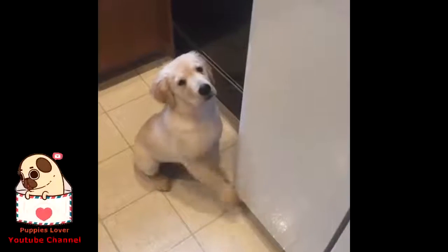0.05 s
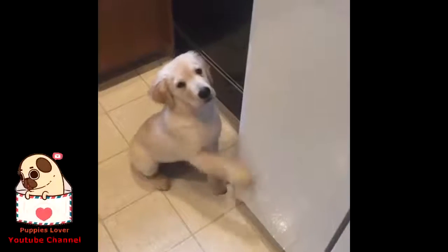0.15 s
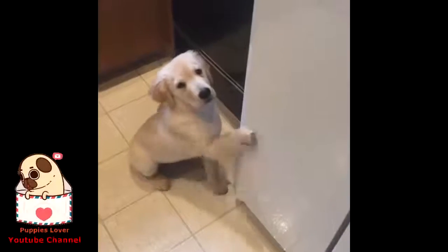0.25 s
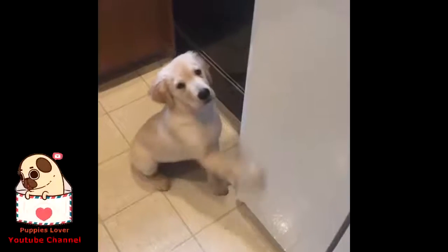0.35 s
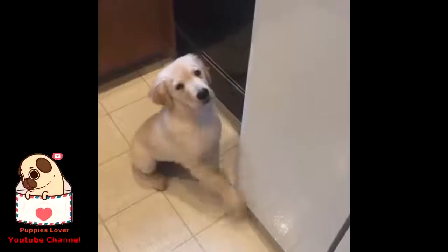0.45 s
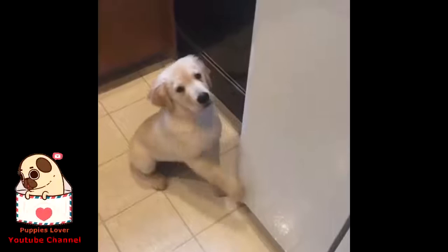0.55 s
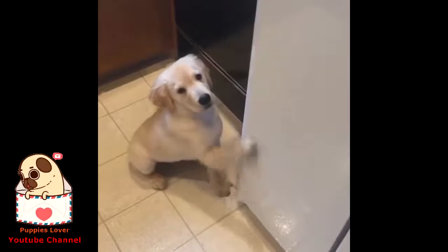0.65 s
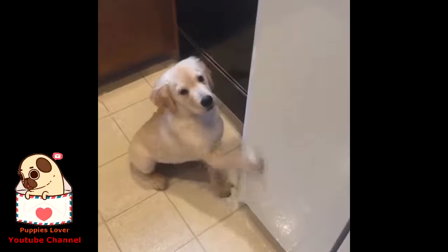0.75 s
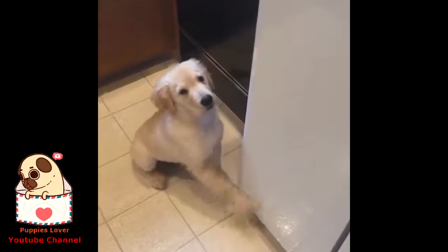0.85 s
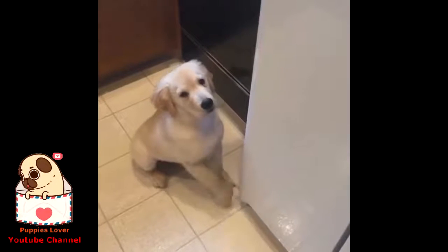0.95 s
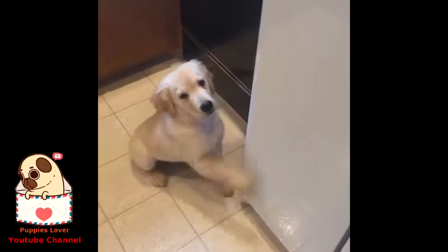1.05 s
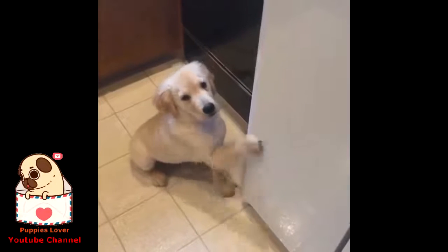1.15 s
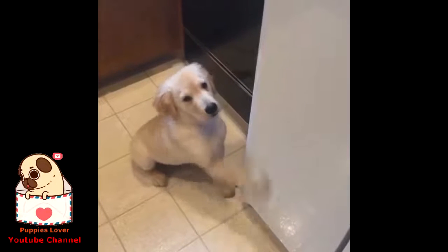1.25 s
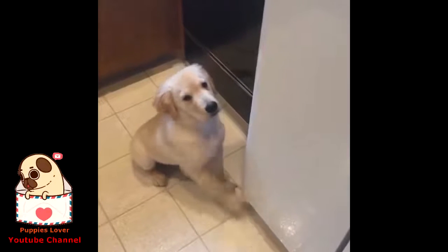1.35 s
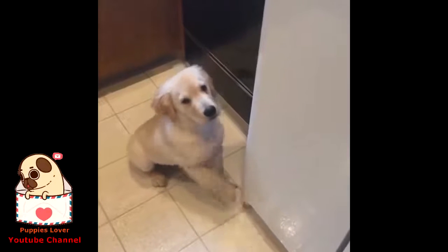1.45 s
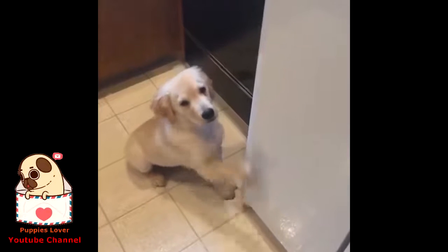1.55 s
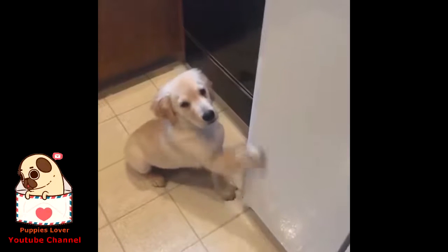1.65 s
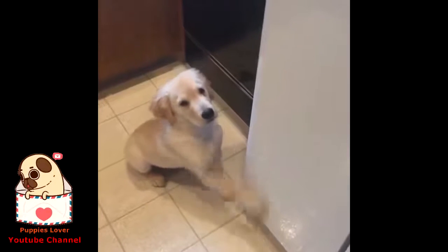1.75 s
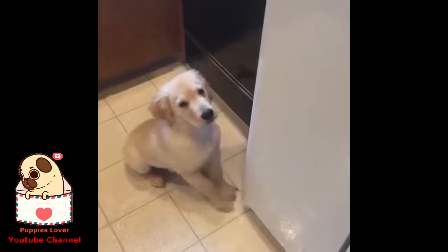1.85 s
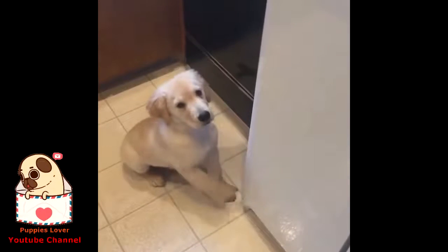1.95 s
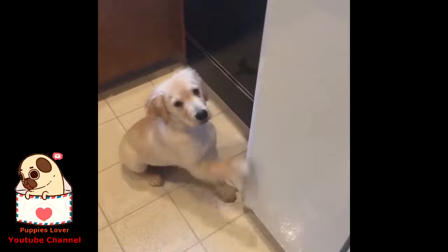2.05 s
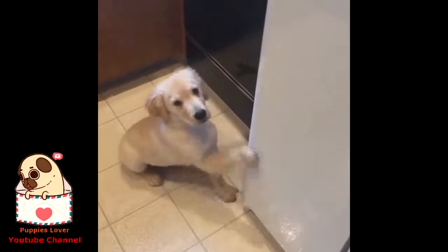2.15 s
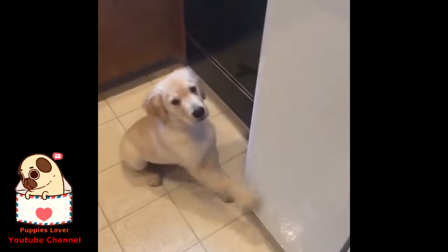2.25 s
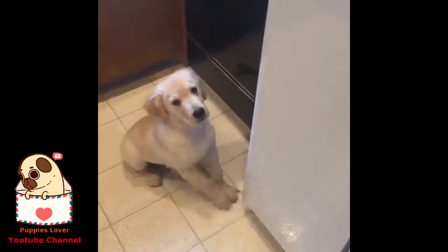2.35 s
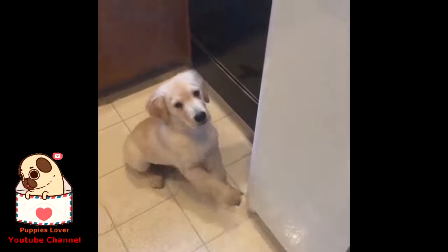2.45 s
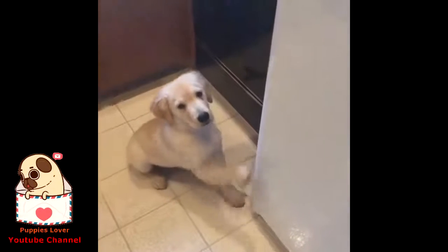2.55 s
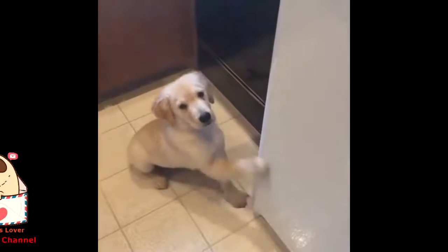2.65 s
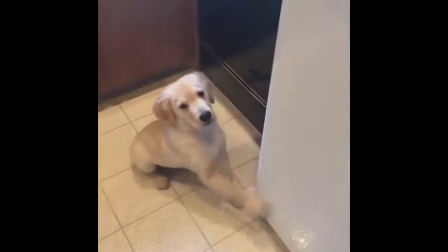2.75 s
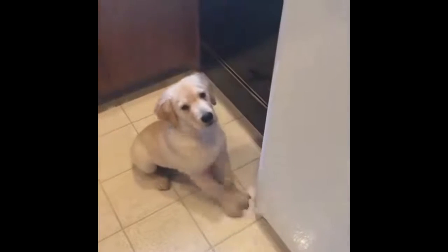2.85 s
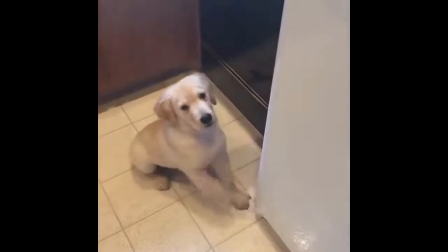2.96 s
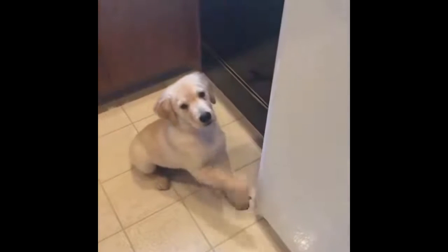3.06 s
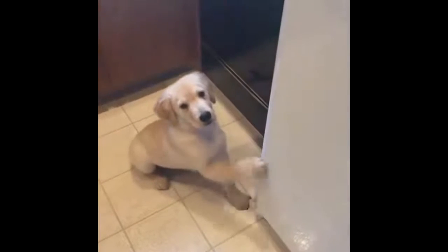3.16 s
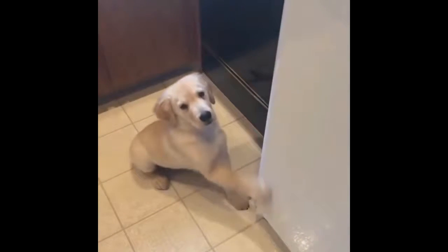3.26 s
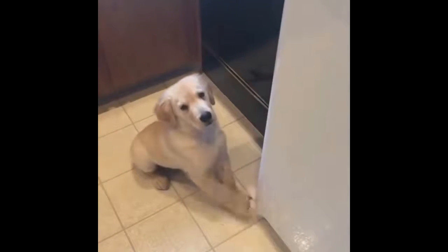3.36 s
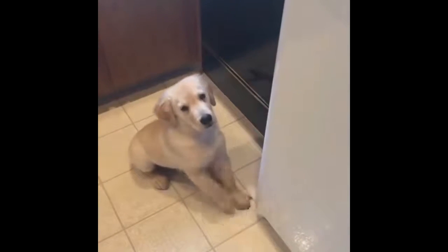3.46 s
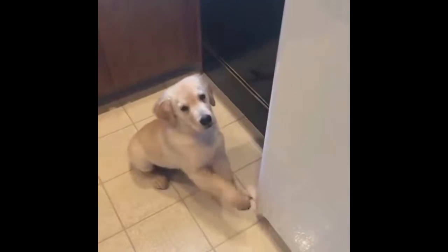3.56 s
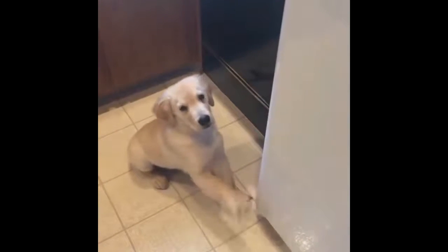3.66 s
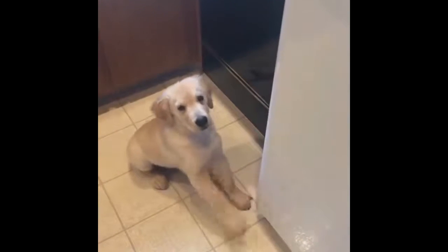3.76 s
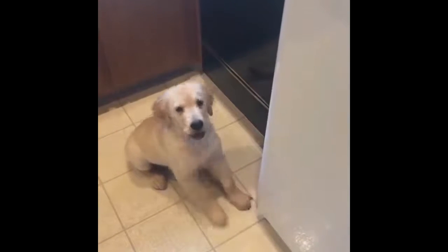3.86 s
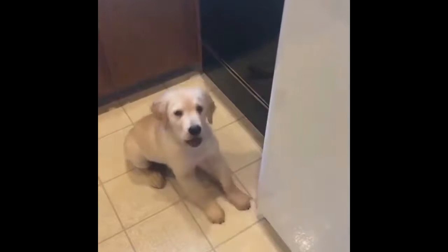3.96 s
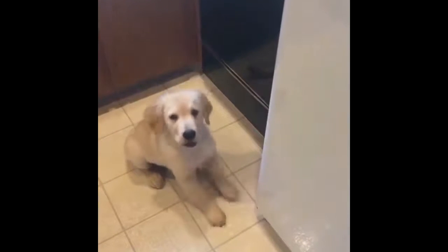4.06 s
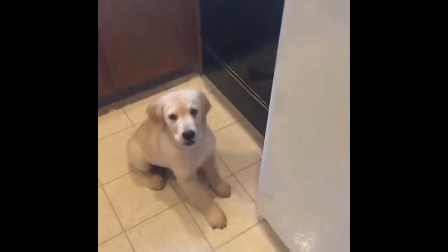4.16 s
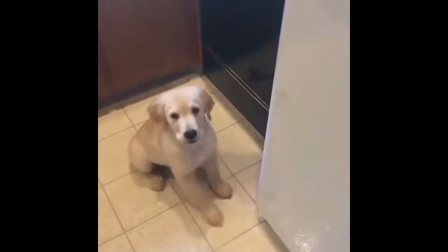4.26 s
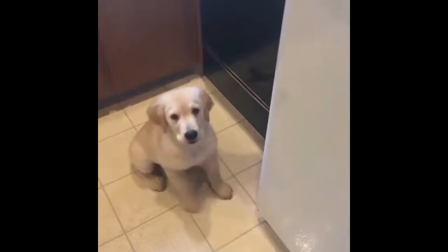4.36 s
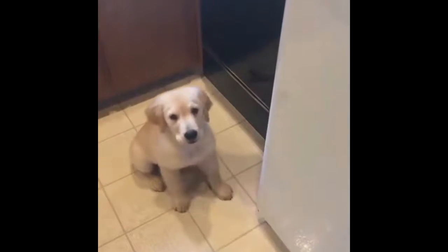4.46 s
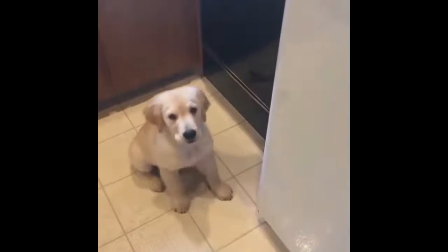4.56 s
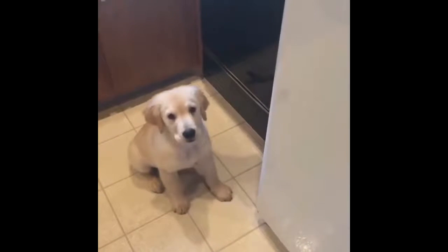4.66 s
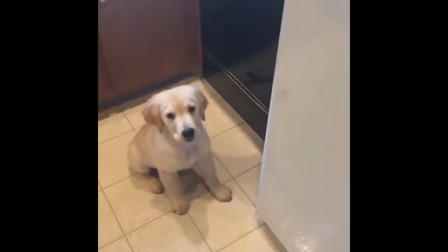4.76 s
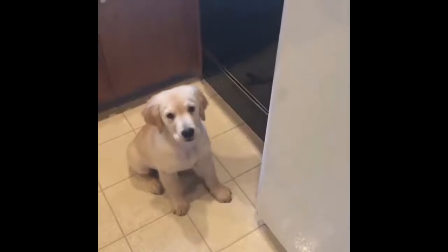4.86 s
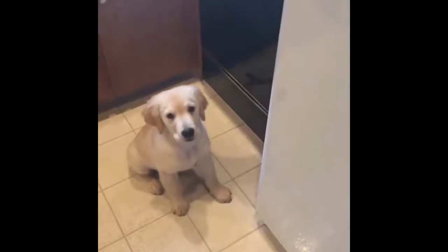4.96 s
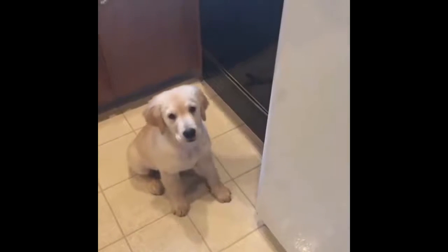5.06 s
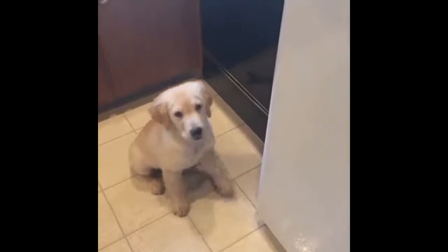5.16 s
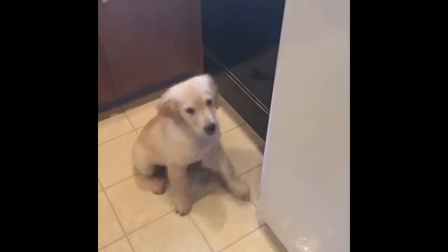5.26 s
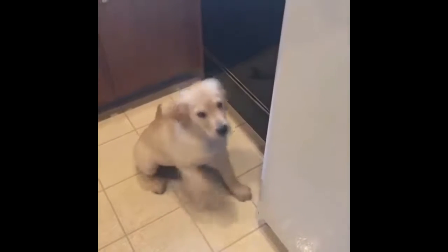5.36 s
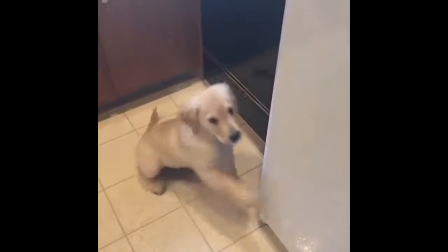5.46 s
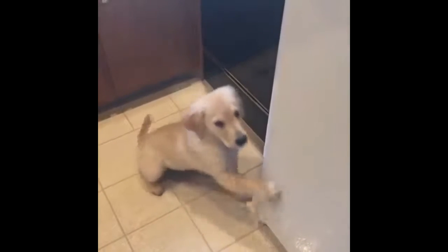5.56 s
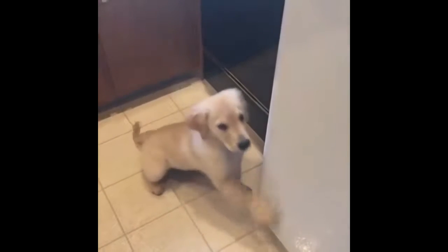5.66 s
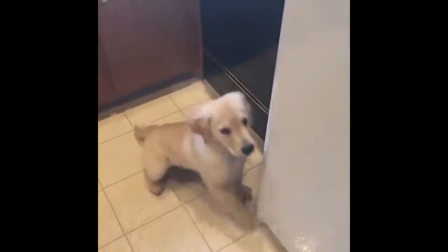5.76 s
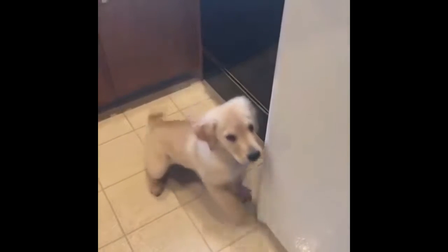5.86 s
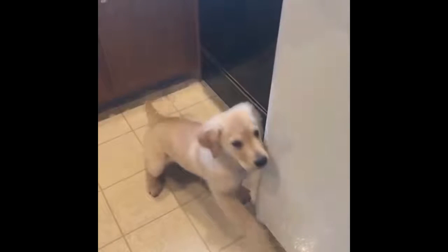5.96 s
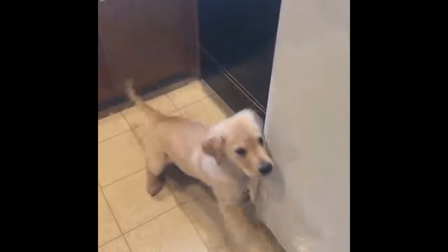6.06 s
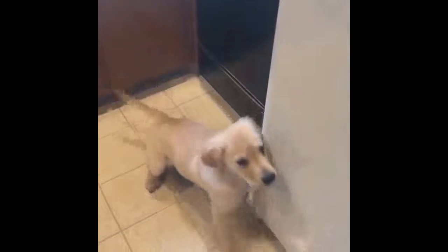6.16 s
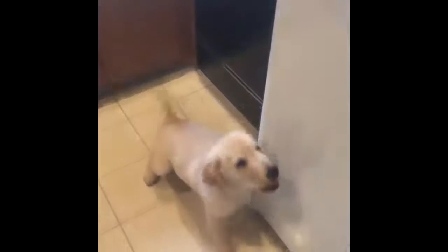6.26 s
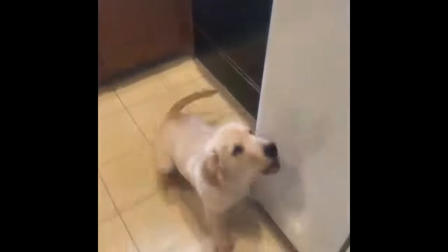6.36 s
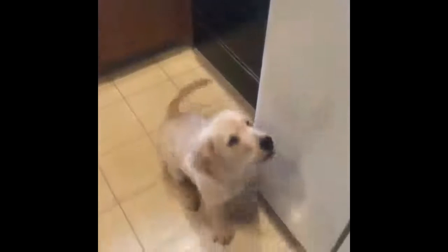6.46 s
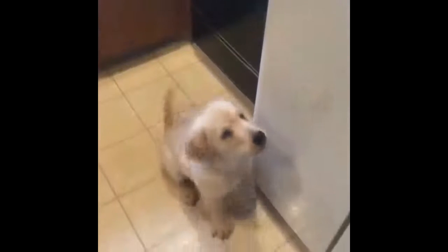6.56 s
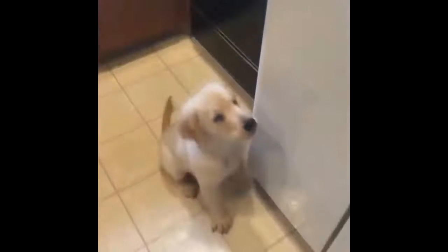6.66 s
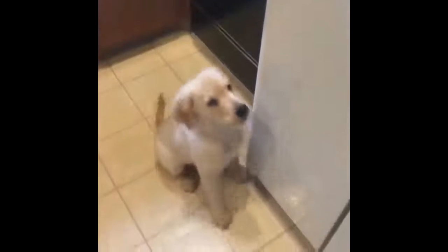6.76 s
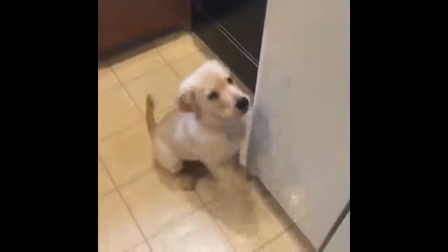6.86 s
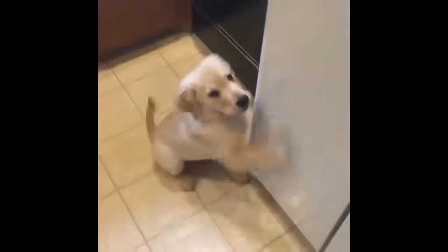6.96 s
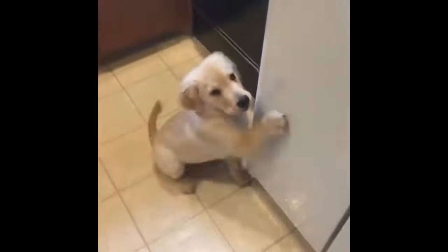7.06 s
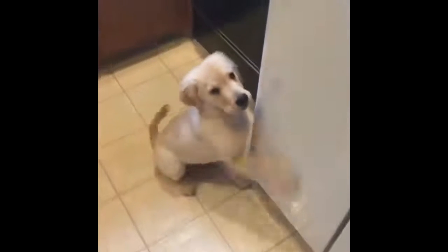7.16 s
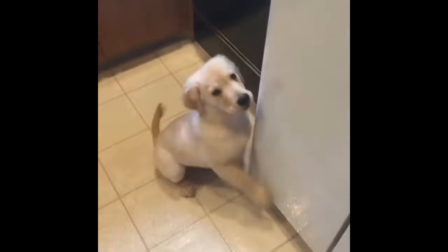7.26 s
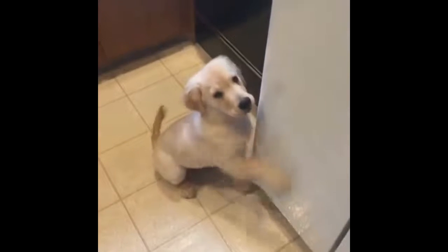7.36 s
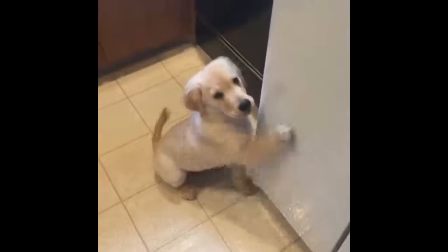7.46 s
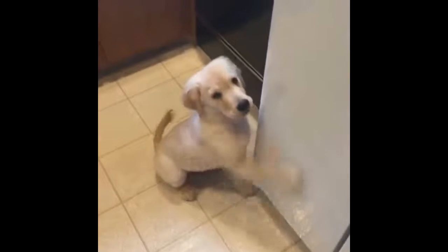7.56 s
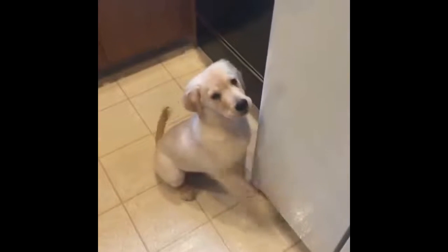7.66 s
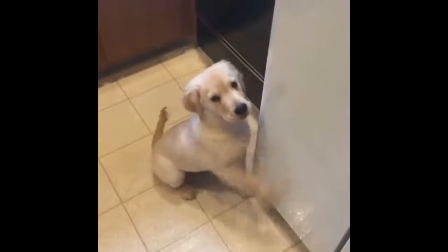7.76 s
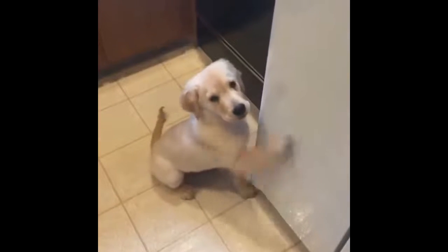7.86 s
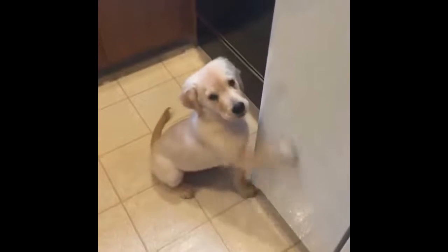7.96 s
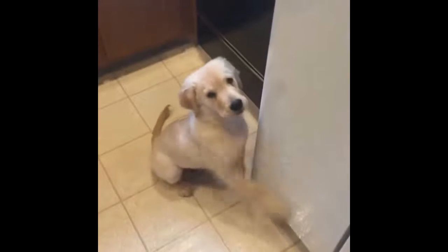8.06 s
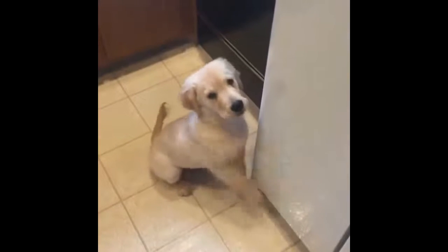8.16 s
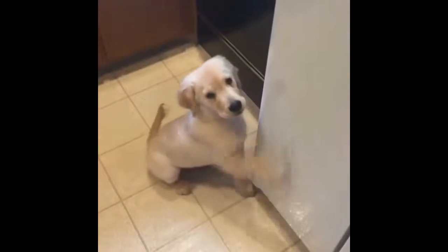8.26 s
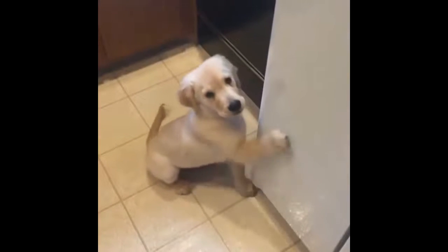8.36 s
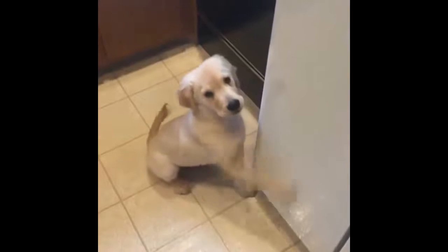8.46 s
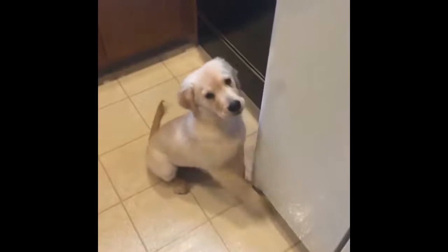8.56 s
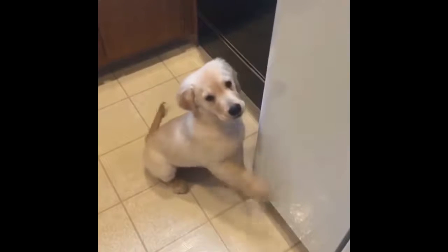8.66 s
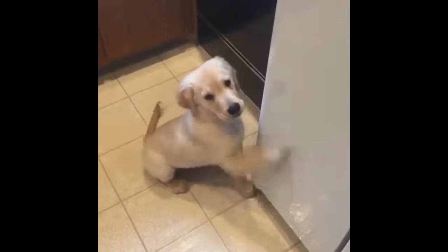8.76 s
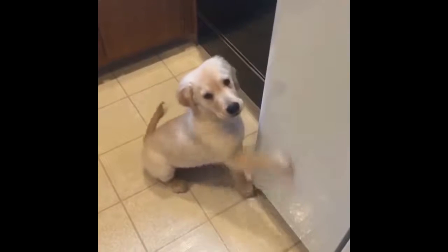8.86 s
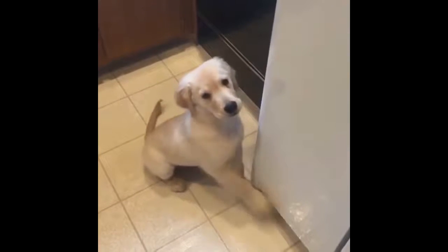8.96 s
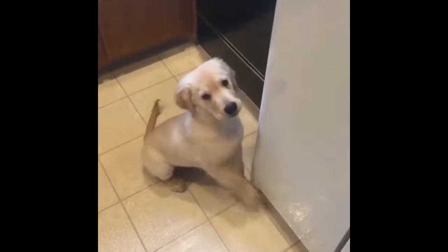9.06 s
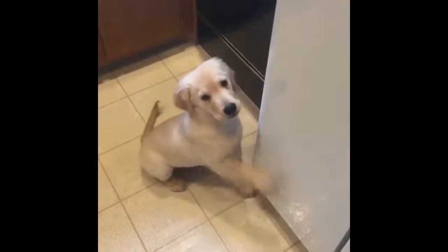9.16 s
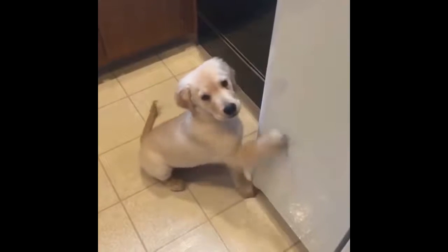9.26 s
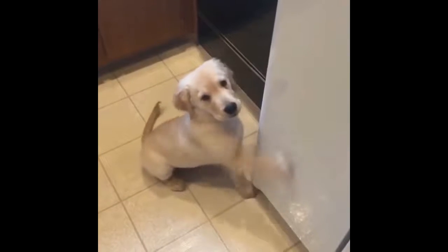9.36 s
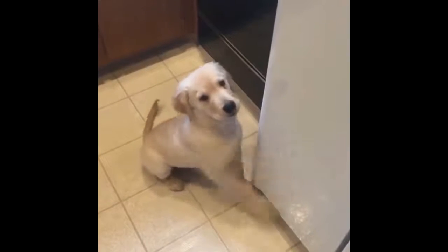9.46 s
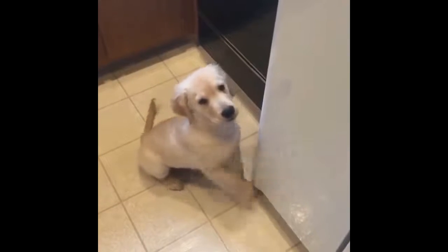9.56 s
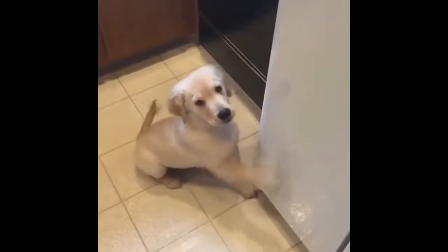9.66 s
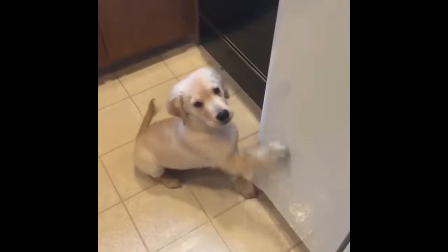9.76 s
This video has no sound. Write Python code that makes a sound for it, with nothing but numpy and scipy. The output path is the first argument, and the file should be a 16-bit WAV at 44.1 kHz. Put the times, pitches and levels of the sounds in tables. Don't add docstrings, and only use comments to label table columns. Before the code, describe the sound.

A quiet refrigerator hum and low room rumble run throughout a reverberant tiled kitchen. From 0 s a puppy paws the door roughly every half second: a quick clattering slap of claws, then a hissing, faintly squeaky drag of about a quarter second. The first strokes are lighter; those from 1.35 to 3.4 s are harder, with small secondary catches and a faint grumble near 2 s. Scratching stops after about 3.7 s. At 4.05 s comes a short hoarse bark, falling in pitch, its echo dying away. Soft footfalls thud at 4.3 and 5.2 s, with faint paw touches around 5.5 to 5.8 s. A louder, rising bark bursts at 6.45 s, with foot thuds around it and at 6.8 s. From 7.2 s rhythmic slaps and scrapes return, ringing the door more, strongest from 9 s, with a low grumble and thin whine near 9.7 s.

```python
import sys
import numpy as np
from scipy import signal
from scipy.fft import rfft, irfft
from scipy.io import wavfile
from scipy.ndimage import uniform_filter1d

SR = 44100
rng = np.random.default_rng(int(sys.argv[2]) if len(sys.argv) > 2 else 0)


def file_out(sig):
    cols = np.atleast_2d(sig).T
    lim = np.clip(cols, -1, 1)
    pcm = np.round(lim * 32767).astype(np.int16)
    wavfile.write(sys.argv[1], SR, pcm)


def makeup_ratio(level_db):
    decades = np.asarray(level_db, float) / 20
    return 10 ** decades


N = 432083
HZ = np.fft.rfftfreq(4096, 1 / SR)


def evened(x):
    return x / np.sqrt(np.mean(x ** 2) + 1e-20)


def read(points, hz):
    f, value = np.transpose(points)
    return np.interp(np.log(hz + 1), np.log(f + 1), value)


def add(mix, s, sound):
    part = mix[round(s * SR):][:len(sound)]
    part += sound[:len(part)]


def columns(rows):
    s, *values = np.transpose(rows)
    t = np.arange(s[0], s[-1], 1 / SR)
    return [s[0]] + [np.interp(t, s, v) for v in values]


def wander(length, hz):
    return evened(uniform_filter1d(rng.standard_normal(length), int(SR / hz)))


def resonate(x, hz, width):
    r = np.exp(-np.pi * width / SR)
    if np.ndim(hz) == 0:
        return 2 * signal.lfilter([1 - r], [1, -r * np.exp(2j * np.pi * hz / SR)], x).real
    turn = np.exp(2j * np.pi * np.cumsum(hz) / SR)
    return 2 * (turn * signal.lfilter([1 - r], [1, -r], x / turn + 1e-18)).real


def twice(x, hz, width):
    return evened(resonate(resonate(x, hz, width), hz, 1.39 * width))


def colour(x, db):
    log_gain = np.log(makeup_ratio(np.maximum(np.r_[db, db[-2:0:-1]], -100)))
    taps = np.fft.ifft(np.exp(np.conj(signal.hilbert(log_gain)))).real[:2048]
    return signal.fftconvolve(x, taps / np.linalg.norm(taps))[:len(x)]


def tilt(low_db, high_db):
    return read([(1200, low_db), (1900, 0.0046), (4500, 0), (7500, high_db), (13000, high_db - 2.0),
                 (15000, high_db)], HZ)


def swell(start, top, end, rise_db, fall_db, bend):
    t = np.arange(start, end, 1 / SR)
    before = np.clip((top - t) / max(top - start, .08), 0, 1)
    after = np.clip((t - top) / (end - top), 0, 1)
    return rise_db * before + fall_db * after ** bend, (t - start) / (end - start)


def panel():
    return 1.5 * wander(len(HZ), hz=3000)


def hum():
    # f/Hz, density/dB
    room_air = [(12, -67.5), (20, -27.5), (60, 0.5), (266, -14.0), (305, -3.5), (447, -14.5), (485, -19.0),
                (673, -22.5), (751, -29.0), (860, -29.5), (1750, -34.0), (2490, -39.5), (13500, -48),
                (13950, -47), (14080, -89)]
    # f/Hz, width/Hz, level/dB
    hum_bands = [(308.7, 5.3, -55.5), (400, 18.6, -62.5), (437.7, 37, -63), (649.4, 30, -68.5),
                 (1499, 100, -77), (6700, 390, -79.5)]
    hz = np.fft.rfftfreq(N, 1 / SR)
    spectrum = rfft(rng.standard_normal(N)) * makeup_ratio(read(room_air, hz))
    low = np.clip((240 - hz) / 60, 0, 1)
    rumble = irfft(spectrum * low, N) * makeup_ratio(1.8 * wander(N, hz=14))
    hiss = irfft(spectrum * (1 - low), N)
    white = rng.standard_normal(N)
    fridge = sum(makeup_ratio(db) * twice(white, f, width) for f, width, db in hum_bands)
    return makeup_ratio(-48.5) * evened(rumble + hiss) + fridge


def kitchen(x):
    # f/Hz, t60/s
    decay = [(100, 0.2), (400, 0.56), (900, 0.7), (2500, 0.51), (6000, 0.5), (14000, 0.24)]
    out, at = np.zeros(N), np.arange(250, SR - 20, 20)
    turn = np.pi * np.arange(N) / SR / 1.43
    for k in range(3):
        taps = np.zeros(SR)
        taps[at + rng.integers(0, 20, len(at))] = rng.choice([-1., 1.], len(at))
        hz, t, z = signal.stft(taps, SR, nperseg=256)
        tail = signal.istft(z * makeup_ratio(-60 * t / read(decay, hz)[:, None]), SR, nperseg=256)[1]
        share = np.sqrt(2 / 3) * np.cos(turn + k * np.pi / 3)
        out += signal.fftconvolve(x * share, tail / np.linalg.norm(tail))[:N]
    return out


def thuds():
    # t/s, level/dB, pitch/Hz, t60/s
    footfalls = [(3.035, -36, 200, 0.14), (3.587, -40, 209, 0.083), (4.274, -38.5, 120, 0.095),
                 (5.225, -32, 113, 0.078), (5.519, -39.5, 151, 0.17), (5.568, -40, 158, 0.1),
                 (5.731, -36.5, 98, 0.09), (6.344, -35.5, 109, 0.14), (6.391, -30.5, 149, 0.082),
                 (6.816, -27.5, 170, 0.094), (9.159, -28.5, 300, 0.032), (9.467, -47, 174, 0.19)]
    out, t = np.zeros(N), np.arange(9000) / SR
    onset = np.sin(np.pi / 2 * np.clip(t / 0.0095, 0, 1)) ** 2
    for s, db, hz, t60 in footfalls:
        puff = twice(resonate(rng.standard_normal(len(t)), hz, 300), hz, 170)
        falling_hz = hz * (.8 + 0.65 * np.exp(-t / .012))
        swing = np.sin(2 * np.pi * np.cumsum(falling_hz) / SR)
        add(out, s, makeup_ratio(db + 7.5 - 60 * t / max(t60, .03)) * (swing + 0.45 * puff) * onset)
    return out


def whine(s, length, db, hz, glide_hz):
    n = round(length * SR)
    pitch_hz = hz * (1 + 0.033 * wander(n, hz=16.2)) + glide_hz * np.linspace(-1, 1, n)
    broken_db = 3 * wander(n, hz=30)
    whistle = twice(rng.standard_normal(n), pitch_hz, 48)
    return s, makeup_ratio(db - 4 + broken_db) * whistle * signal.windows.tukey(n, .4)


def grumble(s, top, end, db, throat_db):
    chest_db = db + swell(s, top, end, rise_db=-12.5, fall_db=-13, bend=1.07)[0]
    n = len(chest_db)
    pulse_hz = 60 * (1 + 0.21 * wander(n + 1, hz=56.6))
    drive = np.diff(np.floor(np.cumsum(pulse_hz) / SR)) + 0.034 * rng.standard_normal(n)
    chest = evened(resonate(resonate(drive, 105.5, 43), 96, 99))
    throat = evened(resonate(resonate(drive, 262, 70), 356, 53))
    return s, makeup_ratio(chest_db - 2.0) * (chest + makeup_ratio(throat_db) * throat) * signal.windows.tukey(n, .3)


def bark(rows, tract, bands, crest_s, throb_hz, depth, rough, leak):
    # f/Hz, density/dB
    breath_tone = [(650, -33.5), (1100, -12.5), (1610, -8), (2100, -9), (2500, -5.5), (2700, -10.5),
                   (3010, -10.5), (5140, -17), (6830, -23.5), (9070, -21), (10000, -31.5), (13300, -31),
                   (15000, -55.5)]
    s, chest_db, air_db, hz, opening = columns(rows)
    huff_hz, open_hz, lift_hz, drop_hz, open_db = tract
    n, shut = len(hz), np.clip(1 - opening, 0, 1)
    mouth_hz = open_hz + lift_hz * shut
    mouth_db = open_db + (-30 - open_db) * shut ** 3.4
    huff_db = -19.5 + (0.1 + 19.5) * shut ** 2.8
    rough = np.clip(rough + leak * (chest_db.max() - chest_db), 0, 1)

    turns = np.cumsum(hz * (1 + .07 * wander(n, hz=104.8))) / SR
    throb = np.cos(2 * np.pi * throb_hz * (s + np.arange(n) / SR - crest_s))
    flutter = 1 + depth * (1 + rough.min() - rough) * throb
    folds = sum(np.cos(2 * np.pi * k * turns) for k in range(1, 4))
    puffs = (1.2 + np.exp(-(turns % 1) / 0.29)) * rng.standard_normal(n)

    chest = (1 - rough) * twice(folds, hz, 250)
    chest += rough * twice(resonate(puffs, hz, 370), 0.828 * hz, 212)
    overtone = resonate(evened(folds) + evened(puffs), 2 * hz, 290)
    chest += makeup_ratio(-15) * twice(overtone, 2 * hz, 196)
    mouth = (1 - rough) * twice(resonate(folds, mouth_hz, 400), mouth_hz, 150)
    hoarse = resonate(resonate(puffs, mouth_hz, 380), 0.84 * mouth_hz, 360)
    mouth += rough * twice(hoarse, mouth_hz, 240)
    huff = twice(resonate(puffs, huff_hz, 360), huff_hz, 240)

    upper = np.zeros(n)
    for f, move, width, db in bands:
        gain = makeup_ratio(db + 3.3 * wander(n, hz=21.7))
        band_hz = f * (1 + .025 * wander(n, hz=13.6)) - move * drop_hz * shut
        upper += gain * twice(puffs, band_hz, width)
    breath = evened(colour(puffs, read(breath_tone, HZ))) * 0.75
    breath += 0.51 * (1.25 - rough) * upper
    voiced = (chest + makeup_ratio(mouth_db) * mouth) * flutter + makeup_ratio(huff_db) * huff
    voice = makeup_ratio(chest_db) * voiced + makeup_ratio(air_db) * breath
    return s, makeup_ratio(-1.0) * voice * signal.windows.tukey(n, .08)


def drags():
    # start/s, firmest/s, end/s, pressure/dB, squeak/Hz
    strokes = [(0.0, -0.028, 0.34, -48, 2220), (0.438, 0.587, 0.74, -52, 2250),
               (0.886, 1.008, 1.157, -49.5, 2100), (1.375, 1.392, 1.645, -43.5, 2400),
               (1.849, 1.842, 2.163, -42.5, 2280), (2.348, 2.43, 2.67, -50.5, 2430),
               (2.5, 2.52, 2.663, -43, 4180), (2.858, 2.91, 3.09, -48, 2960),
               (2.987, 3.057, 3.08, -44.5, 1600), (3.404, 3.492, 3.71, -52, 3100),
               (3.55, 3.59, 3.5, -70, 3480), (5.755, 5.783, 6.16, -62.5, 2250),
               (5.822, 5.884, 5.98, -59, 2490), (7.24, 7.338, 7.53, -46.5, 2320),
               (7.654, 7.72, 8.05, -52.5, 1800), (8.108, 8.14, 8.38, -44.5, 2300),
               (8.545, 8.614, 8.88, -49, 1930), (9.019, 9.043, 9.22, -41.5, 2318),
               (9.499, 9.515, 9.76, -41.5, 2020)]
    # f/Hz, density/dB
    drag_tone = [(290, -43.5), (500, -12.0), (880, -15.5), (1140, -5), (1830, -16), (2280, -8), (4540, -7),
                 (7560, -5), (8930, 0), (13500, -9.5), (16000, -7.0)]
    out = np.zeros(N)
    for s, top, end, db, hz in strokes:
        shape_db, way = swell(s, top, end, rise_db=-8.5, fall_db=-28, bend=1.76)
        pressure_db, n = db + shape_db, len(way)
        squeak_hz = hz * (1 - 0.046 * (way - .5) + 0.078 * wander(n, hz=25.3))
        claw_db = -8.5 - 7.5 * (hz - 2200) / 1000
        sizes = makeup_ratio(0.77 * np.minimum(rng.exponential(1, n), 4.5)) * rng.standard_normal(n)
        slips = sizes * (rng.random(n) < 3500 / SR)
        rub = 0.224 * evened(slips) + 0.79 * rng.standard_normal(n)
        dull = colour(rub, read(drag_tone, HZ) + tilt(0, -12.5) + panel())
        dull += 0.3 * twice(rub, squeak_hz, 340)
        claw_tilt = read([(4500, 12.5), (7000, -23.5), (13000, -28)], HZ)
        bright = colour(rub, read(drag_tone, HZ) + claw_tilt + panel())
        surge_db = 1.06 * wander(n, hz=66.0) + 1.5 * wander(n, hz=25.2)
        grip = makeup_ratio(pressure_db - 3 + surge_db) * np.clip(np.arange(n) / SR / 0.0067, 0, 1)
        add(out, s, grip * (dull + makeup_ratio(claw_db) * bright))
    return out


def strikes():
    # t/s, blow/dB, door ring/dB, sharp edge/dB, claw colour/Hz
    slaps = [(0.008, -44, -8, -7, 2400), (0.427, -48.5, -21, -15, 3400), (0.8689, -44, -11, -11, 2240),
             (1.3504, -31.5, -8, -18.5, 2210), (1.8227, -31.5, -2.5, -16, 2300), (2.32, -34, -18, -9, 2340),
             (2.828, -29.5, -24, -14, 2250), (3.3674, -30, -29, -11.5, 4260), (5.5134, -55, -19, -24, 3000),
             (5.7427, -46.5, -9.5, -15, 2180), (7.2258, -39.5, -3, -25, 2390),
             (7.64, -41.5, -3, -16.5, 2290), (8.082, -33, -2, -17.5, 1500), (8.525, -36, -4.5, -17.5, 1530),
             (8.9911, -31, -2, -18, 1470), (9.4729, -29, -3.5, -18.5, 2230)]
    catches = [(0.0706, -44, -6, -18, 2250), (0.483, -51, 1, -24, 2340), (0.934, -45, -8, -35, 2320),
               (1.407, -44, -40, -19, 1980), (2.392, -41.5, -1.5, -20, 2240), (2.503, -47, -13, -8, 3580),
               (3.0016, -41.5, -15, -33, 4300), (3.031, -42.5, -26, -16, 1470),
               (3.551, -39.5, -8, -10, 3420), (7.269, -42, 1, -27, 1930), (7.6996, -39.5, -5, -26, 2220),
               (8.1417, -39.5, -20, -24, 2270), (8.5835, -39, -16, -24, 1987), (9.06, -45, -8, -27, 2270)]
    # f/Hz, density/dB
    strike_tone = [(290, -20), (500, -8), (821, -9), (1190, -2.0), (1830, -8.5), (2760, -4.5), (4420, -7.5),
                   (6870, -9.0), (13500, -6.5), (16000, -31.5)]
    # f/Hz, width/Hz, level/dB
    door_modes = [(624, 15, -28), (1033, 110, 13), (1115, 29, 5), (1470, 290, 12), (1680, 37, -3.5),
                  (1930, 47, 8), (2570, 45, -41), (2760, 37, -53)]
    out, t = np.zeros(N), np.arange(4000) / SR
    for s, blow_db, ring_db, edge_db, claw_hz in slaps + catches:
        rise = np.clip(t / (.005 + .0005 * max(-33 - blow_db, 0)), 0, 1)
        grit = rng.standard_normal(len(t)) * makeup_ratio(3 * wander(len(t), hz=400))
        shape = rise * (makeup_ratio(-60 * t / .06) + makeup_ratio(-13 - 60 * t / .17))
        rattle = evened(grit * shape) * np.sqrt(np.mean(shape ** 2))
        skin = sum(makeup_ratio(db) * resonate(rattle, hz, width) * np.sqrt(SR / width)
                   for hz, width, db in door_modes)
        lean = tilt(max(ring_db + 6.5, -6), edge_db + 11)
        tick = colour(rattle, read(strike_tone, HZ) + lean + panel())
        claw = 1.2 * resonate(resonate(rattle, claw_hz, 1130), claw_hz, 1500)
        add(out, s - .003, makeup_ratio(blow_db - 1.5) * (tick + claw + makeup_ratio(ring_db - 25) * skin))
    return out


def scene():
    # t/s, fold effort/dB, airflow/dB, pitch/Hz, mouth opening/0-1
    bark_curves = [
        [(4.022, -38, -54, 375, 0.01), (4.053, -27, -48, 376, 0.04), (4.07, -18.5, -46.5, 359.3, .25),
         (4.088, -21, -40, 335.7, 0.88), (4.11, -29.5, -45, 337.5, 0.88), (4.17, -34, -50, 325.7, 0.62),
         (4.29, -50, -65.5, 325, 0.44)],
        [(6.335, -56, -76.5, 322.7, 0.1), (6.36, -39, -59.5, 337.9, .05), (6.415, -38.5, -57.5, 355.7, 0.07),
         (6.457, -16.5, -50.5, 382.1, 0.34), (6.474, -12, -46, 391.5, 0.57), (6.515, -13.5, -38, 417, 0.81),
         (6.53, -29, -35.5, 403, 0.88), (6.61, -40.5, -49.5, 417, 0.93), (6.82, -49, -64, 400, 0.83)],
    ]
    # huff/Hz, mouth/Hz, mouth lift when shut/Hz, upper throat drop when shut/Hz,
    # open mouth re chest/dB
    tracts = [(155, 887, 195, 430, -6), (260, 818, -29, 920, -2.5)]
    # f/Hz, share of throat move/0-1, width/Hz, level/dB
    upper_bands = [
        [(2450, 1.0, 170, -0.5), (2790, .3, 82, -14), (4060, .2, 240, -7), (4670, .1, 150, -11),
         (5720, 0.1, 240, -5.5), (6740, 0.1, 210, -5)],
        [(2250, 1.0, 320, 5.5), (2525, 0.6, 130, -11), (3020, 0.07, 120, -2), (4100, 0.3, 95, -9),
         (5460, 0.4, 300, -8.5), (6580, .3, 150, -2.5)],
    ]
    # crest/s, throb/Hz, depth/0-1, roughness at full effort/0-1, leak/(1/dB slack)
    flutters = [(4.088, 30, .45, .25, .012), (6.4935, 52, .6, .38, .04)]
    # start/s, loudest/s, end/s, chest/dB, throat re chest/dB
    grumbles = [(1.88, 2.08, 2.23, -38, -2.5), (2.502, 2.62, 2.66, -41.5, -14), (3.876, 3.94, 3.7, -57, 7),
                (7.803, 7.9, 8.0, -42, 1), (9.628, 9.714, 9.95, -39.5, 0)]
    # start/s, length/s, level/dB, pitch/Hz, glide/Hz
    whines = [(0.2, 0.27, -65, 1473, 24), (1.7, .1, -71, 1490, -12), (2.192, 0.086, -59.5, 1368, 28),
              (3.87, 0.17, -63.5, 1560, -20), (8.74, .11, -64, 1380, -36), (9.686, 0.15, -60.5, 1495, 64)]
    voice = np.zeros(N)
    for rows, tract, bands, flutter in zip(bark_curves, tracts, upper_bands, flutters):
        add(voice, *bark(rows, tract, bands, *flutter))
    for row in grumbles:
        add(voice, *grumble(*row))
    for row in whines:
        add(voice, *whine(*row))
    hits, rubs, feet = strikes(), drags(), thuds()
    near = makeup_ratio(-10.5) * voice + makeup_ratio(-11) * feet
    wet = kitchen(near + makeup_ratio(-2.5) * hits + makeup_ratio(-13.5) * rubs)
    return (voice + hits + rubs + feet + wet + hum())[None]


def top_cut(x):
    return signal.sosfilt(signal.butter(12, 16490, fs=SR, output="sos"), x)


def record(dry):
    hz = np.fft.rfftfreq(N, 1 / SR)
    step = makeup_ratio(read([(13850, 0), (14050, -15), (15700, -17), (15900, -40)], hz))
    return top_cut(irfft(rfft(dry) * step, N))


dry = scene()
out = record(dry)
file_out(out)
```